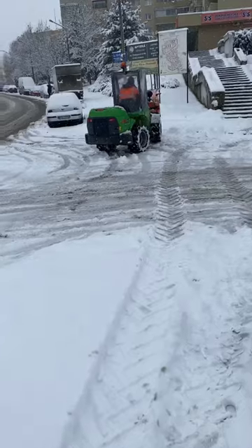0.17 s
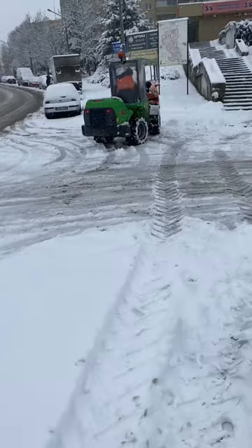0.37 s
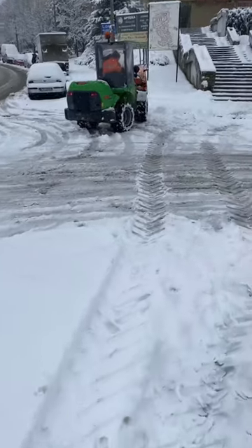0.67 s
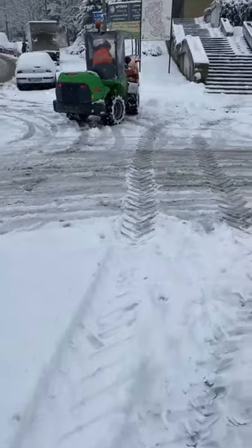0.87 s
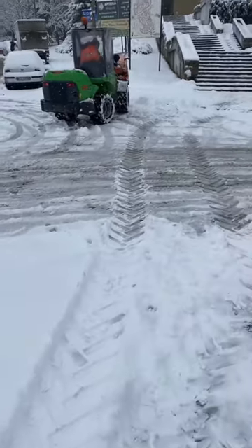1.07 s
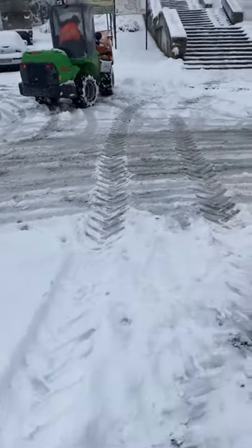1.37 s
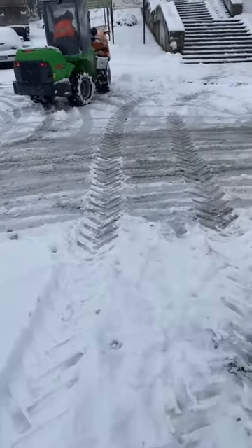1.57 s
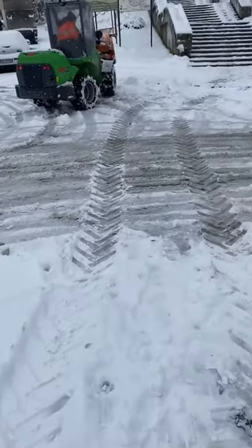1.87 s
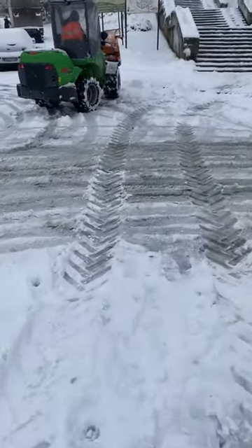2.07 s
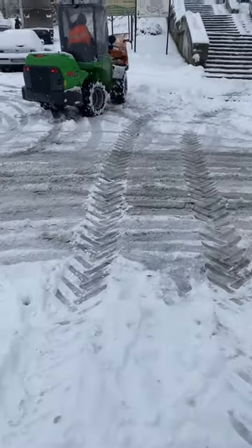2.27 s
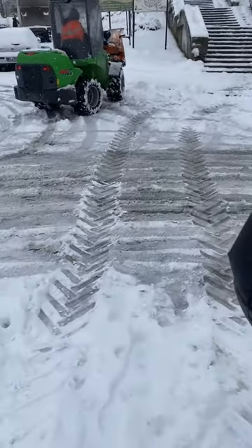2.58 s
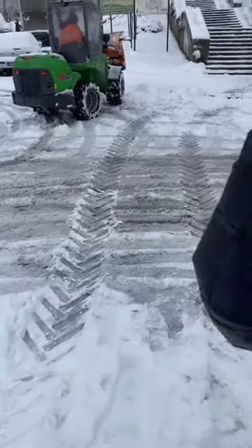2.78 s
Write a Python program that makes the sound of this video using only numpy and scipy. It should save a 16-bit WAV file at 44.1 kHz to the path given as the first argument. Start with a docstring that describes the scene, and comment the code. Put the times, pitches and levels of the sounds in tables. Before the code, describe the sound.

A small diesel tractor drones steadily, with wind buffeting the microphone at first.

```python
"""A small three-cylinder diesel tractor on a snowy street, some metres from one microphone.
From the quick fade-in it drones at steady speed: exhaust pulses, a whining fan and dense clatter,
heard directly and off the snow as a slowly shifting comb. Wind buffets the microphone for the first
second, then eases. At two seconds there is one soft knock close by; the tractor drones on."""
import sys
import numpy as np
from scipy import signal
from scipy.fft import rfft, irfft
from scipy.io import wavfile
from scipy.ndimage import uniform_filter1d, map_coordinates

SR = 44100
rng = np.random.default_rng(int(sys.argv[2]) if len(sys.argv) > 2 else 0)


def unload_wav(signal):
    """Save mono or channel-first audio to the path in sys.argv[1] as 16-bit WAV at rate SR, clipped to [-1, 1]."""
    wavfile.write(
        sys.argv[1],
        SR,
        np.round(np.clip(np.atleast_2d(signal).T, -1, 1) * 32767).astype(np.int16),
    )


N = 128772
T = np.arange(N) / SR


def amp(db):
    """Decibels to gain."""
    return 10 ** (np.asarray(db) / 20)


def unit(x):
    """Scales to rms 1."""
    return x / np.sqrt(np.mean(x ** 2) + 1e-20)


def curve(table):
    """Every column of a time table, joined by straight lines."""
    times, *columns = np.transpose(table)
    return [np.interp(T, times, c) for c in columns]


def colour(x, points):
    """Filters by a spectrum given as points."""
    hz, db = np.transpose(points)
    f = np.fft.rfftfreq(N, 1 / SR)
    return irfft(rfft(x) * amp(np.interp(np.log(f + 1), np.log(hz), db)), N)


def drift(hz):
    """Random wander of rms 1, up to about hz."""
    f = np.fft.rfftfreq(N, 1 / SR)
    return unit(irfft(rfft(rng.standard_normal(N)) * (f > 0) * np.exp(-(f / hz) ** 2), N))


def tone(turns, db, waver_db, waver_hz):
    """One partial of wavering strength."""
    return np.sqrt(2) * amp(db + waver_db * drift(waver_hz)) * np.cos(2 * np.pi * turns)


def wind():
    """Eddies at the microphone: a deep rumble, and a lumpy flutter in the stronger gusts."""
    # gusts: time_s, rumble_db, flutter_db
    gusts = [(.07, -11, -46), (.18, -12.5, -20), (.27, -14, -15.5), (.38, -23, -16.5), (.44, -13, -23),
             (.5, -14, -25), (.55, -19, -35), (.62, -10, -18.5), (.72, -14.5, -36), (.8, -11, -18.5),
             (.87, -9.5, -20), (.935, -12.5, -21), (.98, -19, -24), (1.06, -12.5, -22.5), (1.15, -15, -60),
             (1.33, -26.5, -48), (1.45, -43, -60), (1.72, -26, -67), (1.79, -23, -59), (1.9, -48, -44),
             (2.01, -34, -52), (2.1, -42, -60), (2.9, -31, -54)]
    # spectra of the two wind noises: frequency_hz, level_db
    rumble_spectrum = [(15, -46), (35, -13), (55, -11.5), (85, 2.5), (125, -2), (170, -13), (260, -21),
                       (500, -60), (1000, -80)]
    flutter_spectrum = [(60, -36), (130, 1.5), (220, -1.5), (320, -4.5), (450, -13), (650, -20.5),
                        (1200, -69), (3000, -72)]
    rumble_db, flutter_db = curve(gusts)
    eddies = signal.hilbert(colour(rng.standard_normal(N), rumble_spectrum))
    envelope = np.sqrt(uniform_filter1d(abs(eddies) ** 2, size=2200))
    rumble = unit(eddies.real / envelope)  # evened out, so the gusts set its level
    flutter = unit(colour(rng.standard_normal(N) * amp(3.0 * drift(49)), flutter_spectrum))
    return amp(rumble_db) * rumble + amp(flutter_db) * flutter


def knock(start_s, first_hz, last_hz, sag_s, decay_s):
    """A dull, heavily damped knock near the microphone, its pitch dropping at once."""
    t = np.maximum(T - start_s, 0)
    turns = last_hz * t + (first_hz - last_hz) * sag_s * (1 - np.exp(-t / sag_s))
    return np.sin(2 * np.pi * turns) * np.exp(-t / decay_s)


def ground_bounce(direct):
    """Adds the reflection off the packed snow, under a millisecond late at the microphone."""
    # the reflected path as the geometry changes: time_s, lag_ms, strength_db
    path = [(.15, 0.89, 0.5), (.4, 0.89, 1.5), (.6, 0.83, -1.5), (.85, 0.91, 0.5), (1.07, 0.94, 1),
            (1.35, 0.85, -2), (1.6, 0.83, -2.5), (1.9, .85, 2), (2.03, 0.83, -3), (2.45, .835, -1),
            (2.6, 0.83, -2.5), (2.75, 0.68, -5.5), (2.92, 0.63, -16)]
    # colour of the reflection: frequency_hz, gain_db
    snow = [(100, -12), (600, -6), (1700, -5.5), (3000, -6), (4300, -4), (5500, -10), (7500, -9.5),
            (10000, -15), (15000, -20)]
    lag_ms, strength_db = curve(path)
    delayed_index = np.arange(N) - lag_ms * SR / 1000
    return direct + amp(strength_db) * map_coordinates(colour(direct, snow), [delayed_index], order=3)


def gear_whine(clock):
    """Meshing gears: faint tones that follow the engine speed."""
    # gear tones: pitch_hz, level_db
    gears = [(1374, -41), (1453, -40), (1886, -40.5)]
    return sum(tone(hz * clock + 0.14 * drift(17), db, waver_db=1.5, waver_hz=12) for hz, db in gears)


def fan(blades):
    """Passing fan blades: a hum with fluttering overtones."""
    # harmonics of the blade rate: order, level_db
    harmonics = [(1, -23), (2, -39), (3, -43), (4, -36), (5, -40.5), (6, -44), (8, -52.5)]
    hum = np.zeros(N)
    for k, db in harmonics:
        turns = k * blades + .19 * k ** 2 + .012 * k * drift(11)  # skewed, jittering phase
        hum += tone(turns, db, waver_db=-1.0 + 2.54 * np.log(k), waver_hz=10.6)
    return hum


def clatter(firings, blades, treble_db):
    """Rush and tiny impacts, surging with each firing and chopped by the fan, ring block and panels."""
    # response of the engine block and panels: frequency_hz, gain_db
    block = [(20, -22), (35, -5), (55, 15.5), (100, 4), (200, 4), (290, -1), (400, -4), (550, -1),
             (700, -2.5), (830, 1), (1100, 0), (1420, -3), (1650, -3), (1850, -1), (2000, -6), (2300, -4),
             (2650, 0), (2850, -4), (3050, -11.5), (3400, -9), (4000, -9), (4650, -10.5), (5200, -15),
             (5800, -13.5), (6600, -15.5), (7300, -13.5), (7900, -17.5), (8400, -19), (10000, -20),
             (13000, -23), (15000, -26.5), (16000, -32)]
    impacts_per_s, treble_hz = 700, 6060
    impacts = (rng.random(N) < impacts_per_s / SR) * rng.standard_normal(N)
    drive = rng.standard_normal(N) + 0.38 * unit(impacts)
    surge = 1 + 0.27 * np.exp(-(firings % 1) / 0.25)
    chop = 1 + 0.093 * np.cos(2 * np.pi * blades)
    flicker = amp(0.54 * drift(40))
    body = unit(colour(drive * surge * chop * flicker, block))
    treble = signal.sosfiltfilt(signal.butter(2, treble_hz, "high", fs=SR, output="sos"), body)
    return amp(-21) * (body + (amp(treble_db) - 1) * treble)


def exhaust(firings):
    """Low orders of the firing pulses, smeared by the pipe, each stroke a little uneven."""
    # harmonics of the firing rate: order, level_db
    harmonics = [(1, -26.5), (2, -27), (3, -29), (4, -31), (5, -42), (6, -45.5), (7, -50), (8, -46)]
    pipe_smear = 0.0352
    stroke = firings + .005 * drift(30)
    pulses = sum(tone(k * stroke - pipe_smear * k ** 2, db, waver_db=-0.5, waver_hz=8.5)
                 for k, db in harmonics)
    return amp(.5 * drift(25)) * pulses


def tractor(firing_hz, blade_hz):
    """One slightly wandering engine speed drives every part of the tractor."""
    # loudness as the tractor moves and turns: time_s, level_db, treble_db
    levels = [(.1, -2, -1), (.3, -1, -0.5), (.55, -1, 3), (.85, 0, -3.5), (1.15, 0.5, -2.5),
              (1.35, 0.5, -3), (1.55, 0, 1.5), (1.85, 1, 0), (2.3, 1.5, -0.5), (2.6, 1.5, -2.5),
              (2.9, 1, -0.5)]
    level_db, treble_db = curve(levels)
    clock = np.cumsum(1 + 0.0022 * drift(4.9)) / SR
    firings, blades = firing_hz * clock, blade_hz * clock
    engine = exhaust(firings) + fan(blades) + gear_whine(clock) + clatter(firings, blades, treble_db)
    return amp(level_db) * engine


def scene():
    """The tractor across the snow, wind and a knock right at the microphone, in mono."""
    street = amp(-1.86) * ground_bounce(tractor(firing_hz=58.75, blade_hz=203.1))
    nearby = amp(-7) * knock(start_s=2.0468, first_hz=950, last_hz=240, sag_s=.0012, decay_s=.002)
    return (street + wind() + nearby)[None]


def record(dry):
    """The recorder fades in quickly, rounds off the highest wind peaks, then limits the band."""
    start_s, fade_s, start_db = 0.073, 0.068, -11
    knee, ceiling, edge_hz = .6, .95, 15750
    fade_db = start_db * np.clip(1 - (T - start_s) / fade_s, 0, 1)
    faded = dry * (T >= start_s) * amp(fade_db)
    under = np.clip(faded, -knee, knee)
    rounded = under + (ceiling - knee) * np.tanh((faded - under) / (ceiling - knee))
    lowpass = signal.firwin(511, edge_hz, window=("kaiser", 9), fs=SR)
    return signal.oaconvolve(rounded, lowpass[None], "same")


dry = scene()
out = record(dry)
unload_wav(out)
```